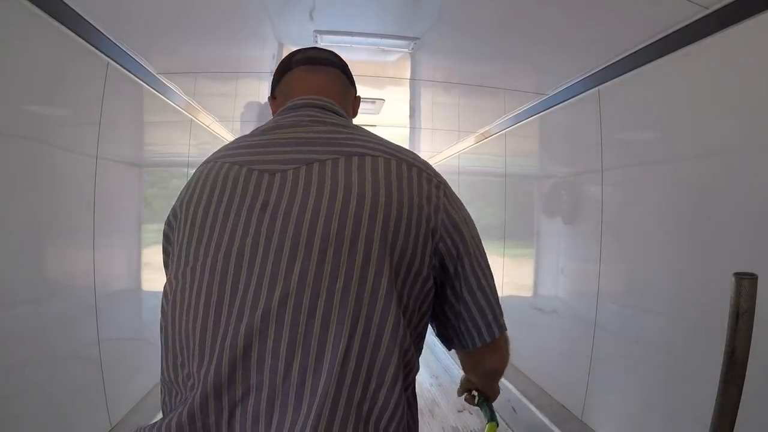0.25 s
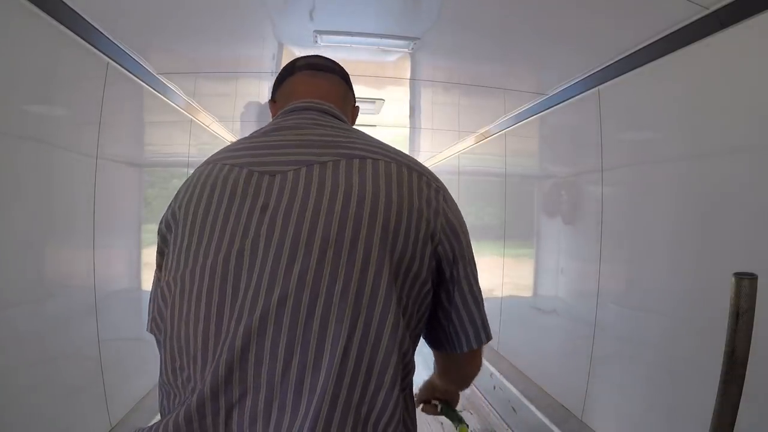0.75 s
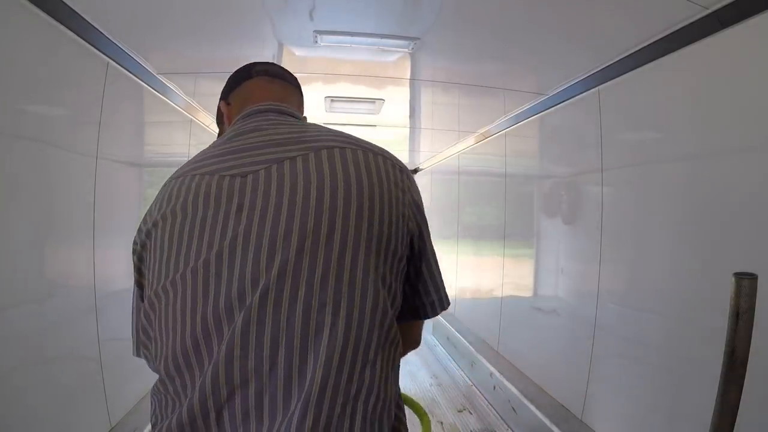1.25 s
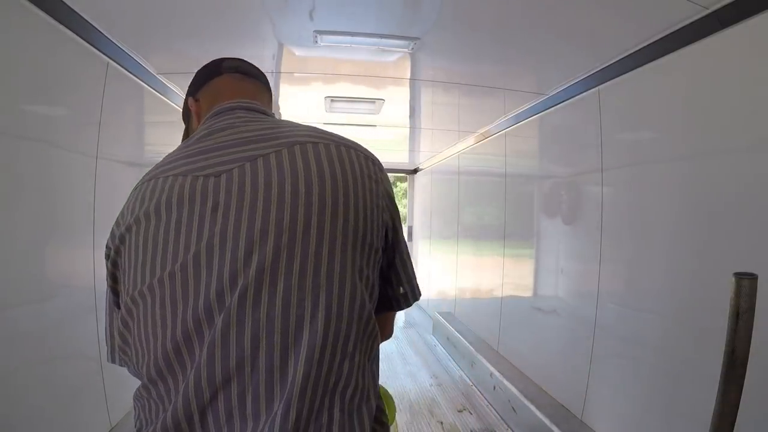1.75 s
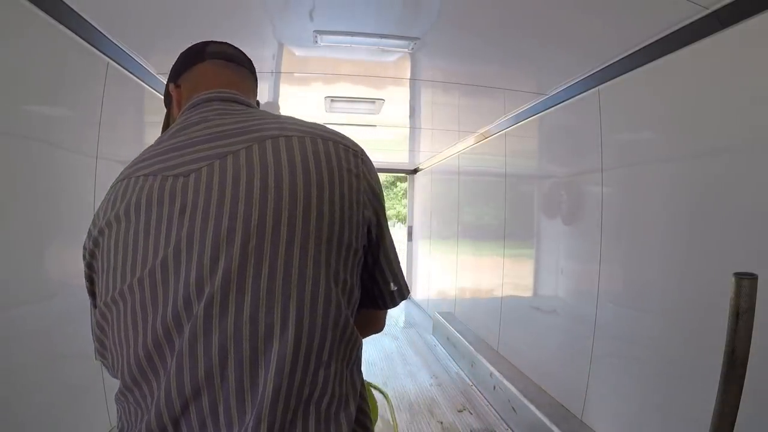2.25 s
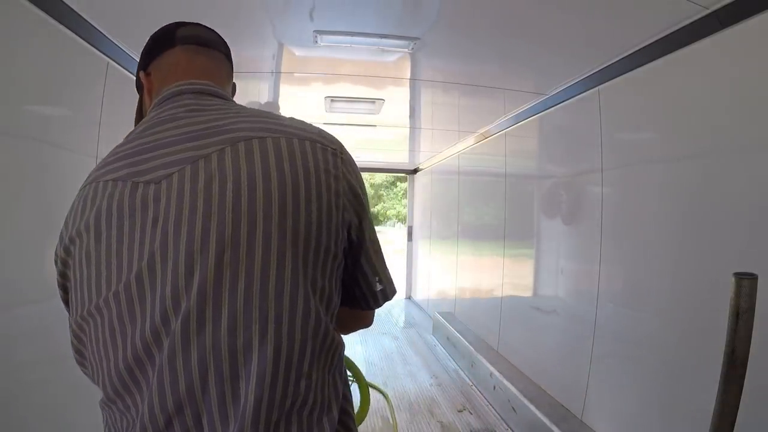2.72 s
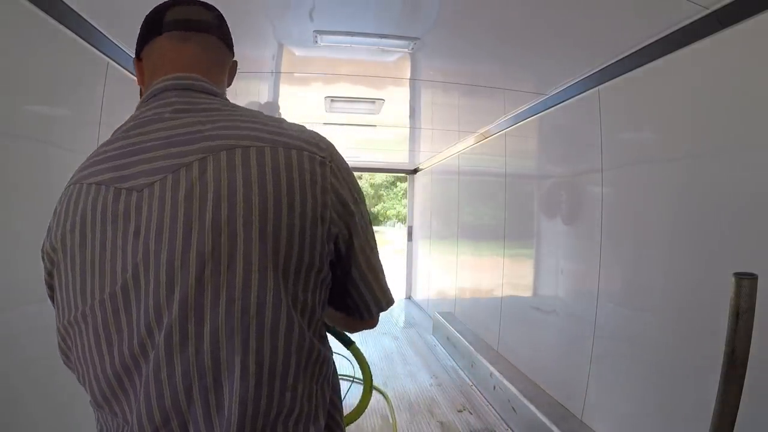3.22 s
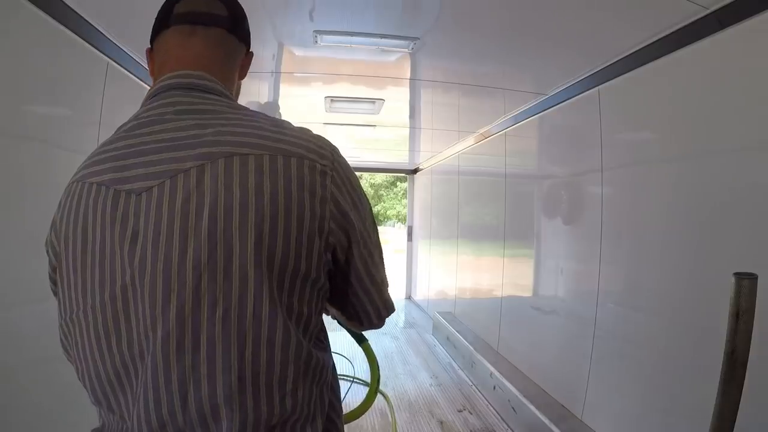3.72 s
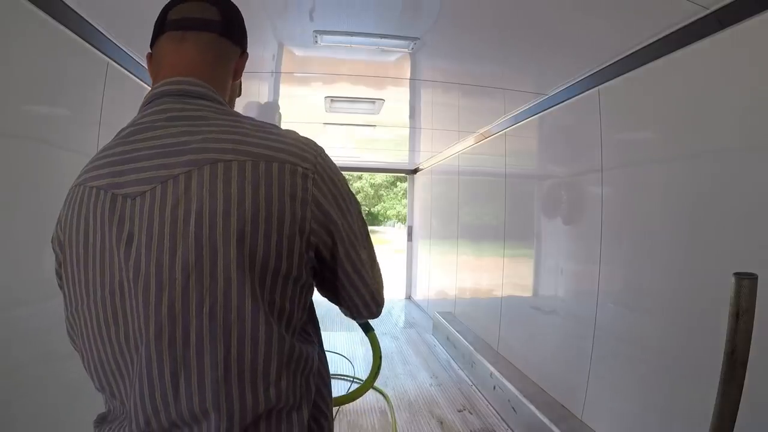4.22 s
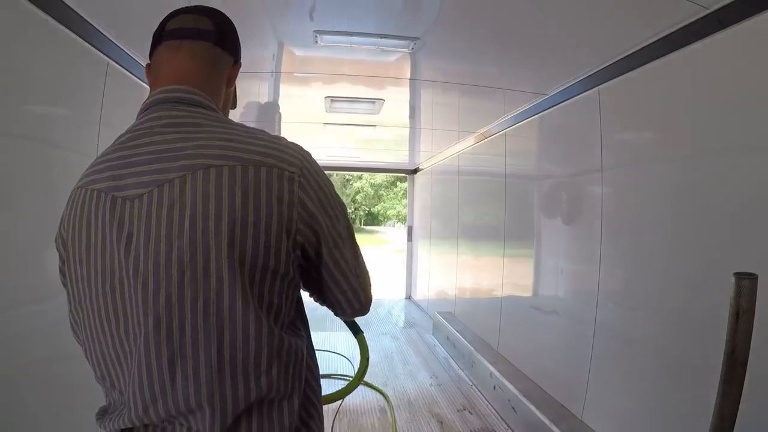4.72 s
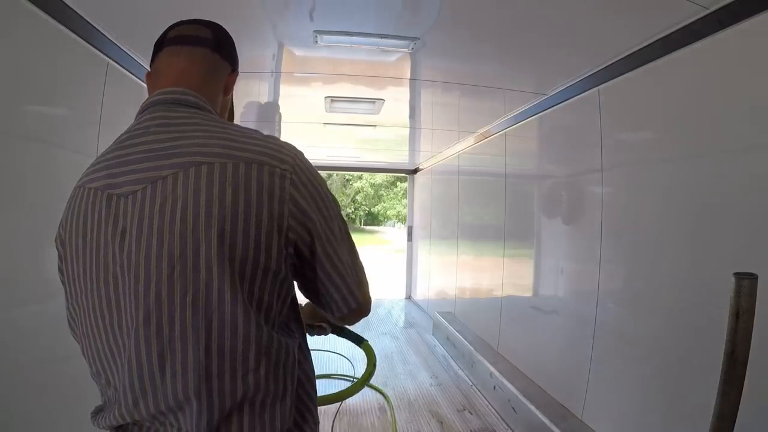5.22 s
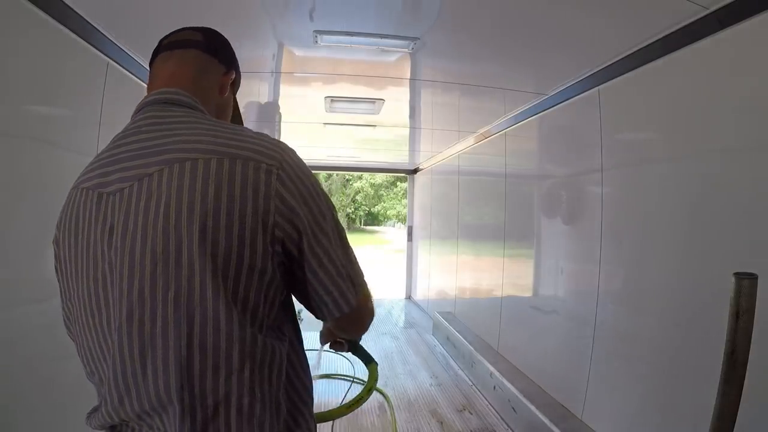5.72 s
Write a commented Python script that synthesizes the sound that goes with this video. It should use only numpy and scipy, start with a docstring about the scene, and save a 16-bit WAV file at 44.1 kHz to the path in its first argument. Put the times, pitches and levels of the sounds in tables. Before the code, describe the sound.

Water from a hose runs without a break for about six seconds inside an enclosed, hard-walled trailer. The spray is a dense, grainy hiss with splashing mid tones and small plinking drops, coloured by a very short, boxy reflection. It starts fairly strong, swelling several times a second as the nozzle sweeps. Sharp wet splats cluster at 0.5-1.0 s. From 1.3 to 2.2 s the jet drums hollowly on the floor panels, with shifting low, dull pitches. Fat gobs slap at about 2.3-2.5 s, with a brief wet ring, and splashing surges until 2.7 s. After 2.8 s the spray drops back, softest around 4.2 s, with gentler pulses and a light splat near 3.7 s. It revives somewhat after 5.2 s. Faint low air rumble is strongest at the start. From 5.75 to 5.92 s, a quick run of soft deep bumps grows louder. Close, slightly wide stereo pickup.

```python
"""Closed, hard-walled trailer: a hose nozzle is waved to and fro over the floor.
Drops hiss and splash as filtered random impacts, some ring as plinks; the walls add a short noise tail.
The jet drums on resonant floor panels, swelling near single pitches; gobs splat and ring the wet floor.
Air rumbles on the microphone ports as low noise; at the end the mount rings at a few low bumps."""
import sys
import numpy as np
from scipy import signal
from scipy.fft import rfft, irfft, next_fast_len
from scipy.io import wavfile
from scipy.ndimage import uniform_filter1d

SR = 44100
rng = np.random.default_rng(int(sys.argv[2]) if len(sys.argv) > 2 else 0)


def inscribe(sig):
    """Save sig as 16-bit PCM at rate SR to the path in sys.argv[1].

    A 1-D sig is mono; a 2-D sig holds one channel per row.
    Samples are clipped to [-1, 1] before scaling.
    """
    pcm = np.round(np.clip(np.atleast_2d(sig).T, -1, 1) * 32767)
    wavfile.write(sys.argv[1], SR, pcm.astype(np.int16))


N = 262836
SIZE = next_fast_len(N + SR // 2)      # FFT length, with room for a tail
HZ = np.maximum(np.arange(SIZE // 2 + 1) * SR / SIZE, 1)

# Source levels stand ahead of trailer, ports and pan.
# Jet landing near or far: (time [s], hiss [dB], splash [dB], slap over splash [dB], mist over hiss [dB])
JET_LEVELS = [(0.0, -29.5, -34.5, -3, 1), (0.4, -29.5, -38, -5, 0), (0.66, -32, -35.5, -2.5, 1.5),
              (0.95, -27.5, -34.5, -5, 0), (1.3, -29.5, -36.5, 0.5, 1), (1.7, -28.5, -32.5, -1, -3),
              (2.1, -29, -38, 0.5, -4), (2.4, -31, -30.5, -3.5, -3), (2.8, -34.5, -41.5, 1, -4.5),
              (3.3, -35.5, -42, -0.5, -1.5), (3.55, -36.5, -43, 0, 0), (3.8, -36.5, -44, -0.5, 0),
              (4.25, -39.5, -46.5, 0.5, 1.5), (4.5, -35, -41.5, -2.5, -1), (4.95, -37, -40, -1.5, 4),
              (5.3, -31, -41.5, 2, 0), (5.68, -33.5, -43, 0.5, -1.5), (5.96, -36.5, -38, -4.5, 3.5)]
# Nozzle waves, the short ones slaps: (time [s], hiss swell [dB], splash swell [dB], bell sigma [s])
STROKES = [(.07, -0.5, 3, 0.056), (.27, 0.5, 3.5, 0.066), (.38, 2.5, -3.5, 0.01), (.51, 1.5, 5.5, 0.038),
           (.72, 0, 0, 0.033), (.81, 2.5, 4, 0.01), (.89, 2.5, 2, 0.034), (.96, -1.5, 5.5, 0.027),
           (1.09, 0, 3.5, 0.043), (1.5, 2, -1.5, 0.1), (1.7, 0, 2, 0.074), (1.84, 1.5, -3, 0.043),
           (2.02, 1.5, 3.5, 0.045), (2.28, 3.5, 5.5, 0.051), (2.415, 3, 5, 0.015), (2.62, 4, 5, 0.11),
           (2.69, 3.5, 0, 0.034), (2.92, 7.5, 8.5, 0.089), (3.17, 5, 5.5, 0.063), (3.38, 1, 1.5, 0.026),
           (3.46, 4, 5.5, 0.048), (3.69, 4, 5, 0.042), (3.75, -0.5, 1, .02), (3.92, 4, 6.5, 0.052),
           (4.12, 3, 3.5, 0.041), (4.36, 2.5, 3, 0.044), (4.47, 2, 3.5, 0.039), (4.7, 1, 1.5, 0.029),
           (4.99, 1, 1.5, 0.017), (5.28, 4.5, 3.5, 0.03), (5.42, 2, 3.5, 0.038), (5.56, 2.5, 1, 0.037),
           (5.81, 5, 4.5, 0.045), (5.91, 4.5, 6, 0.032)]
# Drop sizes, fat to fine: (lower band edge [Hz], impact rate [1/s], flicker [dB])
DROP_SIZES = [(463, 2500, 1.0), (1266, 3500, 1), (2276, 8000, 1), (3840, 15000, 0.88), (9050, 13000, 1.6)]
# Colour of the drops in the trailer: (frequency [Hz], density [dB per Hz])
SPRAY_COLOUR = [(300, 1), (500, -6.5), (700, 3.5), (900, 4.5), (1300, -1), (1500, 1.5), (1650, -1.5),
                (1800, 1), (2100, -3.5), (2600, -8.5), (3400, -6.5), (4200, -13.5), (5500, -6),
                (6300, -3.5), (7500, -3.5), (8500, -9.5), (10000, -10), (11300, -16.5), (12500, -17.5),
                (15000, -24.5)]
# Panels under the jet: (time [s], deep modes [dB], middle modes [dB], upper modes [dB])
DRUM_LEVELS = [(0, -55.5, -46.5, -41.5), (.55, -38, -43.5, -41), (1, -44, -47, -46),
               (1.25, -39, -45, -45.5), (1.6, -42.5, -36.5, -38), (2.1, -37.5, -40.5, -41.5),
               (2.5, -43, -38, -39.5), (2.75, -42, -37, -47.5), (2.95, -42.5, -34.5, -44),
               (3.3, -47.5, -41.5, -50), (3.8, -49, -41.5, -52), (4.05, -44, -39, -52.5),
               (4.25, -49, -50, -51), (4.5, -42.5, -40.5, -45.5), (4.8, -45.5, -43.5, -49),
               (5.15, -42.5, -38.5, -45), (5.45, -43, -48, -46.5), (5.7, -43.5, -43.5, -48),
               (5.96, -49, -57, -46)]
# Floor panel modes, one list per group: (frequency [Hz], width [Hz], relative density [dB])
PANEL_GROUPS = [
    [(138.7, 9.4, -13.5), (158.9, 10, -1.5), (183, 8.9, -8)],
    [(208.7, 16, 1), (227, 13.1, 5), (273.6, 12.5, -3)],
    [(297.2, 14.5, -2), (333.7, 17, -5), (369.3, 17, -4), (414.6, 17.7, -4.5), (453, 23, -4),
     (480.7, 20, -9), (558.4, 14.5, -5.5)],
]
# Part of the splash swell taken by each panel group: (share [dB per dB])
DRUM_FOLLOWS = [0.95, 0.26, 0.7]
# Short swells of the drumming near a pitch: (time [s], swell [dB], pitch [Hz])
PITCH_SWELLS = [(.18, 5, 296), (.21, 0, 262), (.38, 5.5, 220), (.5, 2.5, 310), (.57, 3.5, 160),
                (.77, 4.5, 161), (.94, 5, 156), (1.07, -1, 160), (1.13, 7, 237), (1.27, 3, 160),
                (1.4, 5.5, 225), (1.47, 6.5, 234), (1.53, 4.5, 280), (1.64, 6, 164), (1.69, 4, 225),
                (1.71, 8, 159), (1.79, 5.5, 235), (1.89, 7, 235), (2.3, 2, 159), (2.4, 1.5, 160),
                (2.62, 6, 278), (2.7, 2, 268), (2.8, 6, 226), (2.83, 4.5, 161), (2.9, 4, 227),
                (2.95, 3, 163), (3.1, 5, 227), (3.13, -0.5, 162), (3.18, 5.5, 228), (3.24, 4, 161),
                (3.38, 4.5, 162), (3.4, 6.5, 222), (3.48, 2.5, 157), (3.66, 4, 225), (3.72, 4, 162),
                (3.9, 5.5, 228), (3.97, 3, 160), (4.1, -0.5, 205), (4.17, 3.5, 228), (4.18, 3, 160),
                (4.35, 8, 178), (4.36, 4.5, 225), (4.49, 2.5, 230), (4.52, 1.5, 176), (4.65, 6, 222),
                (4.98, 5.5, 290), (5.05, 3.5, 227), (5.18, 2.5, 225), (5.31, 6, 228), (5.49, 8, 157),
                (5.58, 9, 260), (5.64, 5, 175), (5.79, 6.5, 146), (5.85, 4.5, 165), (5.88, 8, 378)]
# Air on the ports: (time [s], level [dB])
WIND_LEVEL = [(0, -57.5), (.6, -61), (1.22, -61), (1.45, -68), (2.5, -70), (3.1, -66), (3.6, -71),
              (5.3, -72), (5.45, -64), (5.7, -70)]
# Colour of that air: (frequency [Hz], density [dB per Hz])
AIR_COLOUR = [(20, -7), (30, -2), (45, -5), (57, 1), (72, -9), (90, 2), (115, -5), (200, -10), (400, -44)]
# Port pair: (frequency [Hz], left-right likeness [0-1], left lead [rad], left over right [dB])
PORT_PAIR = [(120, .97, 0, -4.5), (220, .95, .05, -5.5), (300, .91, .3, -8.4), (390, .67, 1.3, -10.7),
             (480, .62, 1.9, -5.6), (580, .86, 2.4, -2), (900, .82, 2.9, -.2), (1200, .45, 3.3, -1.8),
             (1700, .5, 1.9, .1), (2100, .3, 3.7, 2.1), (2800, .1, 5.6, -.9), (3500, .6, 6.4, -1.3),
             (4200, .8, 6.2, .8), (5000, .22, 6.5, 4.4), (6300, .05, 4, 6.8), (7600, .05, 3, 2.2),
             (9000, .16, 2.9, -1.8), (11500, .4, 3.2, -1.2), (15000, .1, 3, .3)]
# Gobs hitting the floor: (time [s], peak [dB], fatness [dB])
SPLATS = [(.505, -30, -19), (0.754, -26, -13), (0.798, -20.5, -25), (.915, -20, -9), (0.956, -21, -21),
          (.975, -27, -20), (2.262, -31, -16), (2.294, -16, -12), (2.417, -22, 9), (2.467, -21, 1),
          (3.685, -24.5, -27)]
# Resonances of the thin and the fat part of a splat: (frequency [Hz], width [Hz], level [dB])
SPLAT_THIN = [(1580, 380, -11), (3200, 1000, -19)]
SPLAT_FAT = [(560, 49, 19), (800, 560, 2)]
# Wet floor ring: (frequency [Hz], width [Hz], level [dB])
FLOOR_RING = [(1510, 40, -4), (1670, 50, 11), (2170, 45, -18)]
# Lower ring after a fat gob: (frequency [Hz], width [Hz], level [dB])
SLAP_RING = [(335, 73, -4), (543, 40, 0)]
# Knocks on the mount: (time [s], peak [dB])
BUMPS = [(5.752, -47.5), (5.786, -36), (5.81, -43), (5.835, -35), (5.861, -28), (5.887, -23.5),
         (5.924, -21.5)]
# Mount resonances: (frequency [Hz], width [Hz], level [dB])
MOUNT_MODES = [(30, 31, -3), (58, 13, 5.5), (110, 55, -14.5), (220, 110, -8)]

DROP_SPREAD_DB = 3
PATTER_FOLLOWS_SPLASH = 0.35      # dB per dB of splash over hiss
PLINK_OVER_HISS_DB, PLINKS_PER_S = -11.5, 500.0
PLINK_LOW_HZ, PLINK_HIGH_HZ = 598, 5240
PLINK_CYCLES = 31      # cycles in which a plink falls by 57 dB
HOLLOW_DB, HOLLOW_FOLLOWS = -48, 1.44      # at mean splash; dB per dB of splash
TRAILER_T60_S, TRAILER_DB = 0.11, -4.5      # tail level is against the direct sound
MODE_WANDER_DB = 2.5
SWELL_SIGMA_S, GROUP_REACH_OCTAVES, MODE_REACH_OCTAVES = 0.033, 0.35, 0.1
WIND_ALIKE, WIND_PAN_DB = 0.71, -3.5      # pan is left over right
SPLAT_SIGMA_S, RING_UNDER_PEAK_DB = 0.01, -19
LOW_CUT_HZ, CUTOFF_HZ = 126.7, 15250


def from_db(db):
    """Gain of a level in dB."""
    return 10 ** (np.asarray(db) / 20)


def rms_one(x):
    """Scale to rms 1."""
    return x / np.sqrt(np.mean(x ** 2) + 1e-20)


def even(x, hold_s, amount):
    """Divide out part of the running level of a noise to calm its swelling; rms 1."""
    power = uniform_filter1d(x ** 2, size=round(hold_s * SR))
    return rms_one(x / power ** (amount / 2))


def in_time(rows):
    """Columns of a time table at every sample."""
    s, *columns = np.transpose(rows)
    return [np.interp(np.arange(N) / SR, s, column) for column in columns]


def over_hz(rows):
    """Columns of a frequency table at every FFT bin, on a log axis."""
    hz, *columns = np.transpose(rows)
    return [np.interp(np.log(HZ), np.log(hz), column) for column in columns]


def shape(x, gain):
    """Filter by a gain per FFT bin."""
    return irfft(rfft(x, SIZE) * gain, SIZE)[..., :N]


def drift(corner_hz):
    """Slow random curve of rms about 1: noise at SR/40 through a double one-pole low-pass."""
    r = np.exp(-80 * np.pi * corner_hz / SR)
    noise = rng.standard_normal(N // 40 + 2002)
    slow = signal.lfilter([1], [1, -2 * r, r * r], noise)[2000:]      # settled part
    return np.interp(np.arange(N) / 40, np.arange(len(slow)), rms_one(slow))


def swells(times_s, heights_db, sigmas_s):
    """Bell-shaped level changes, summed in dB."""
    t = np.arange(0, N, 40) / SR
    bells = np.exp(-.5 * ((t[:, None] - times_s) / sigmas_s) ** 2)
    return np.interp(np.arange(N) / SR, t, bells @ heights_db)


def resonate(x, modes):
    """Parallel two-pole resonances with alternating signs."""
    out = 0
    for k, (hz, width_hz, db) in enumerate(modes):
        r = np.exp(-np.pi * width_hz / SR)
        b = (1 - r * r) / 2 * np.array([1, 0, -1])
        a = [1, -2 * r * np.cos(2 * np.pi * hz / SR), r * r]
        out = out + (-1) ** k * from_db(db) * signal.lfilter(b, a, x)
    return out


def struck(times_s, peaks_db, modes, contact_s):
    """Soft blows: a Hann push of the contact time rings the modes of a body."""
    push = np.pad(np.hanning(round(contact_s * SR) + 2), (0, SR // 4))
    knock = resonate(push, modes)
    clicks = np.zeros(N)
    clicks[np.round(np.asarray(times_s) * SR).astype(int)] = from_db(peaks_db)
    return signal.fftconvolve(clicks, knock / abs(knock).max())[:N]


def drops(per_s):
    """Two unrelated showers of uneven impacts: one shared by both ports, one scattered by the walls."""
    size_db = DROP_SPREAD_DB * np.minimum(rng.exponential(1, (2, N)), 5)
    impacts = from_db(size_db) * rng.choice([-1, 1], (2, N))
    return impacts * (rng.random((2, N)) < per_s / SR)


def spray(hiss_db, splash_db, slap_db, mist_db):
    """Each drop size fills its own band, with a small random level flicker."""
    colour = from_db(over_hz(SPRAY_COLOUR)[0])
    above = [1 / (1 + (hz / HZ) ** 8) for hz, _, _ in DROP_SIZES] + [0]      # power share above each edge
    shares = [low - high for low, high in zip(above, above[1:])]
    # band 1 sets the scale of slap and splash, band 3 that of the finer drops
    units = [np.sqrt(np.sum(colour ** 2 * shares[k])) for k in (1, 1, 3, 3, 3)]
    wetness_db = splash_db - hiss_db
    patter_db = hiss_db + PATTER_FOLLOWS_SPLASH * (wetness_db - wetness_db.mean())
    fine_db = hiss_db + mist_db + 1.44 * drift(4.0)
    levels_db = splash_db + slap_db, splash_db, patter_db, hiss_db, fine_db
    out = 0
    for (_, per_s, flicker_db), share, unit, db in zip(DROP_SIZES, shares, units, levels_db):
        shower = shape(rms_one(drops(per_s)), colour * np.sqrt(share * len(HZ)) / unit)
        out = out + from_db(db + flicker_db * drift(16.5)) * shower
    return out


def plinks(db, count=14):
    """Scattered drops trap bubbles that ring for a moment, each pitch coming and going in patches."""
    hits, dealt = drops(PLINKS_PER_S), rng.integers(0, count, N)
    pitches_hz = np.geomspace(PLINK_LOW_HZ, PLINK_HIGH_HZ, count) * rng.uniform(0.96, 1.05, count)
    rings = 0
    for k, hz in enumerate(pitches_hz):
        bubble = [(hz, 2.1 * hz / PLINK_CYCLES, 0)]
        rings = rings + from_db(2.8 * drift(5.0)) * resonate(hits * (dealt == k) + 1e-18, bubble)
    return from_db(db) * rms_one(rings)


def hollow(splash_db):
    """Splash keeps the wet floor ringing; the ring grows faster than the splash."""
    ring = rms_one(resonate(drops(900.0), FLOOR_RING))
    return from_db(HOLLOW_DB + HOLLOW_FOLLOWS * (splash_db - splash_db.mean())) * ring


def trailer(x, count=8):
    """The jet wanders over spots on the floor; each adds its own dense dying tail off the hard walls."""
    t = np.arange(SR // 2) / SR
    spot = count * drift(3.88) / 2 % count
    out = x
    for k in range(count):
        apart = abs((spot - k + count / 2) % count - count / 2)
        share = np.sqrt(np.clip(1 - apart, 0, 1))      # constant-power cross-fade
        tail = rng.standard_normal((2, len(t))) * from_db(-60 * t / TRAILER_T60_S) * (t > .003)
        tail = from_db(TRAILER_DB) * tail / np.sqrt(np.sum(tail ** 2, axis=1, keepdims=True))
        out = out + shape(x * share, rfft(tail, SIZE))
    return out / np.sqrt(1 + from_db(2 * TRAILER_DB))


def pitch_swells(near_hz, octaves):
    """Swell [dB] of the drumming near a pitch."""
    s, db, hz = np.transpose(PITCH_SWELLS)
    nearness = np.exp(-.5 * (np.log2(hz / near_hz) / octaves) ** 2)
    return swells(s, db * nearness, SWELL_SIGMA_S)


def drum_levels(stroke_db):
    """Each panel group follows the strokes in part and swells near the pitch of its strongest mode."""
    centres_hz = [max(modes, key=lambda mode: mode[2])[0] for modes in PANEL_GROUPS]
    return [slow_db + share * stroke_db + pitch_swells(hz, GROUP_REACH_OCTAVES)
            for slow_db, share, hz in zip(in_time(DRUM_LEVELS), DRUM_FOLLOWS, centres_hz)]


def floor_drum(levels_db):
    """The pelting jet keeps panel modes ringing; each wanders in level and swells near its own pitch."""
    pelting, out = drops(3000.0), 0
    for db, modes in zip(levels_db, PANEL_GROUPS):
        group = 0
        for k, (hz, width_hz, mode_db) in enumerate(modes):
            ring = even(resonate(pelting, [(hz, width_hz, 0)]), 0.073, 0.4)
            ring_db = mode_db + MODE_WANDER_DB * drift(3.2) + pitch_swells(hz, MODE_REACH_OCTAVES)
            group = group + (-1) ** k * from_db(ring_db) * np.sqrt(width_hz) * ring
        out = out + from_db(db) * even(group, 0.079, 0.6)
    return out


def wind(db):
    """Low turbulent noise, partly alike on both ports."""
    colour = from_db(over_hz(AIR_COLOUR)[0]) * (HZ > 12)
    left, other = even(shape(rng.standard_normal((2, N)), colour), .12, .5)
    right = WIND_ALIKE * left + np.sqrt(1 - WIND_ALIKE ** 2) * other
    return from_db(db) * np.array([left, right])


def splats():
    """Gobs burst as thin and fat resonant noise, then ring the wet floor, lower for fat ones."""
    s, db, fat_db = np.transpose(SPLATS)
    t = np.arange(N) / SR
    out = 0
    for modes, peaks_db in ((SPLAT_THIN, db), (SPLAT_FAT, db + fat_db)):
        burst = sum(gain * np.exp(-.5 * ((t - at_s) / SPLAT_SIGMA_S) ** 2)
                    for at_s, gain in zip(s, from_db(peaks_db)))
        noise = even(resonate(rng.standard_normal((2, N)), modes), 0.02, 0.39)
        out = out + burst * noise / 3      # noise peaks near 3 x rms
    ring_db = db + RING_UNDER_PEAK_DB
    return out + struck(s, ring_db, FLOOR_RING, 0.00068) + struck(s, ring_db + fat_db, SLAP_RING, 0.0013)


def bumps():
    """Soft knocks shake the mount, which rings briefly in the deep bass."""
    return struck(*np.transpose(BUMPS), MOUNT_MODES, 0.0044)


def ports(shared, scattered):
    """Two close ports in one housing: likeness, phase and balance depend on frequency."""
    alike, lead_rad, balance_db = over_hz(PORT_PAIR)
    left = shape(shared, from_db(balance_db / 2))
    right = shape(shared, alike * np.exp(-1j * lead_rad)) + shape(scattered, np.sqrt(1 - alike ** 2))
    return np.array([left, shape(right, from_db(-balance_db / 2))])


def scene():
    """Spray in the trailer, drum and splats pass a wind filter; air and knocks come on top."""
    hiss_db, splash_db, slap_db, mist_db = in_time(JET_LEVELS)
    s, hiss_swell_db, splash_swell_db, sigmas_s = np.transpose(STROKES)
    stroke_db = swells(s, splash_swell_db, sigmas_s)
    hiss_db = hiss_db + swells(s, hiss_swell_db, sigmas_s)
    splash_db = splash_db + stroke_db
    water = spray(hiss_db, splash_db, slap_db, mist_db)
    water = water + plinks(hiss_db + PLINK_OVER_HISS_DB) + hollow(splash_db)
    water = trailer(water) * from_db(2.0)
    water = water + floor_drum(drum_levels(stroke_db)) + splats()
    low_cut = signal.cheby1(7, 1, LOW_CUT_HZ, "high", fs=SR, output="sos")
    pan = from_db([[WIND_PAN_DB / 2], [-WIND_PAN_DB / 2]])
    rumble = (wind(in_time(WIND_LEVEL)[0]) + bumps()) * pan
    return signal.sosfilt(low_cut, ports(*water)) + rumble


def record(dry):
    """Steep elliptic low-pass at the top."""
    return signal.sosfilt(signal.ellip(12, .5, 80, CUTOFF_HZ, fs=SR, output="sos"), dry)


dry = scene()
out = record(dry)
inscribe(out)
```